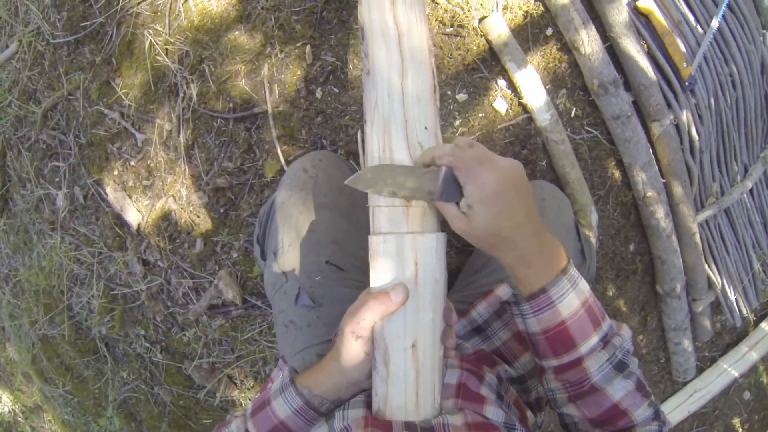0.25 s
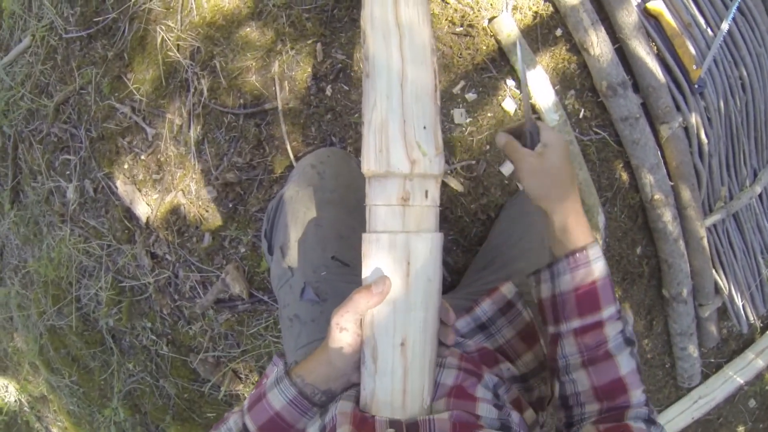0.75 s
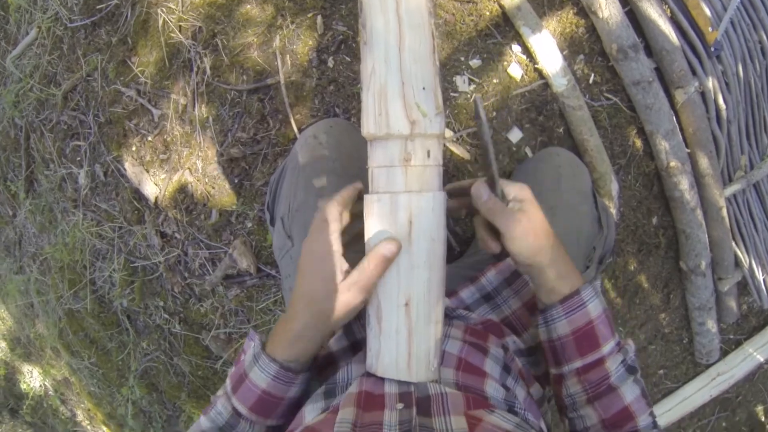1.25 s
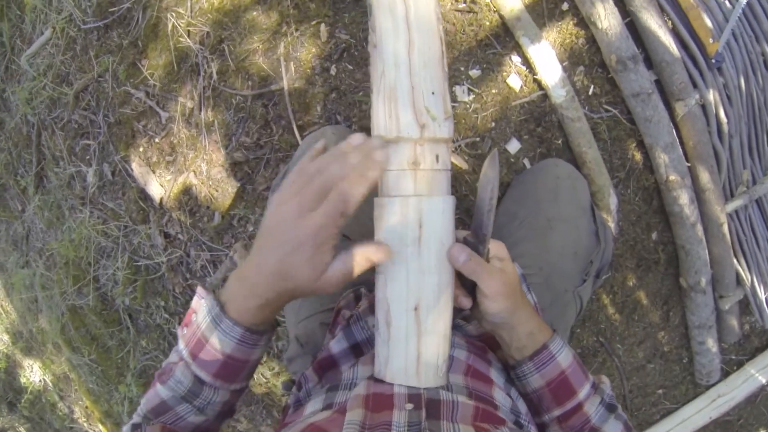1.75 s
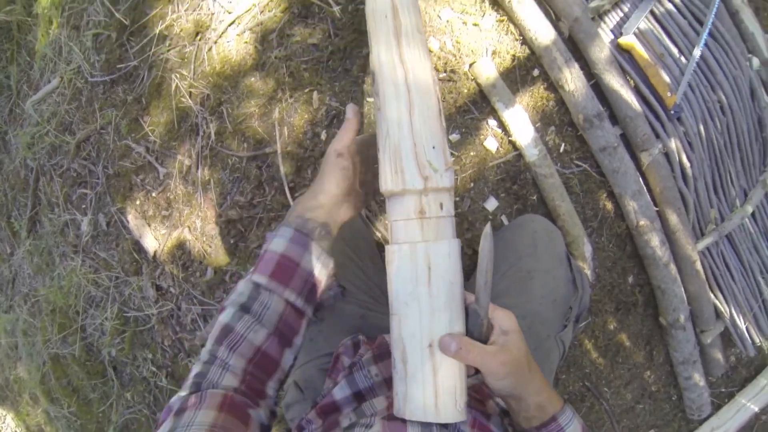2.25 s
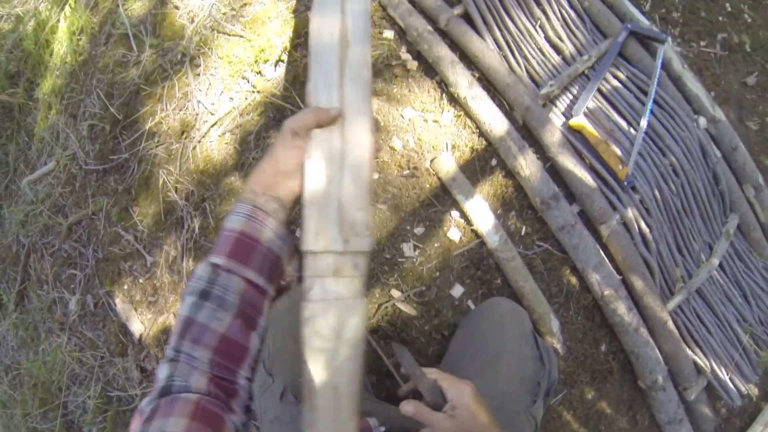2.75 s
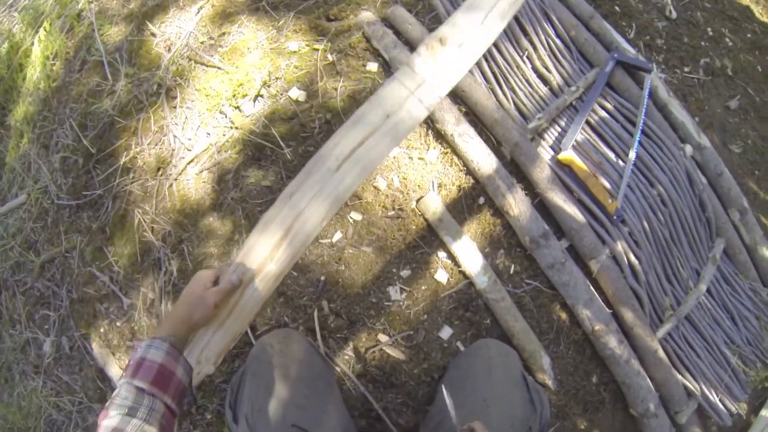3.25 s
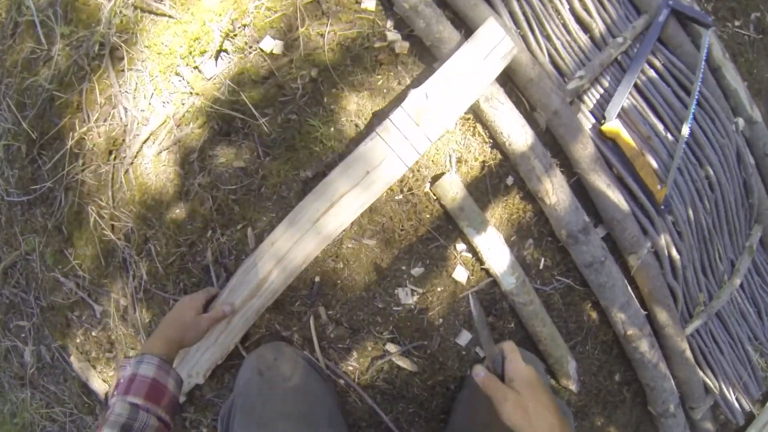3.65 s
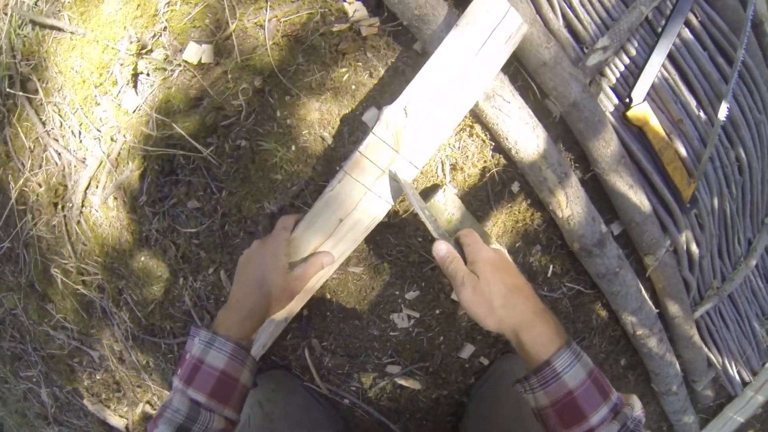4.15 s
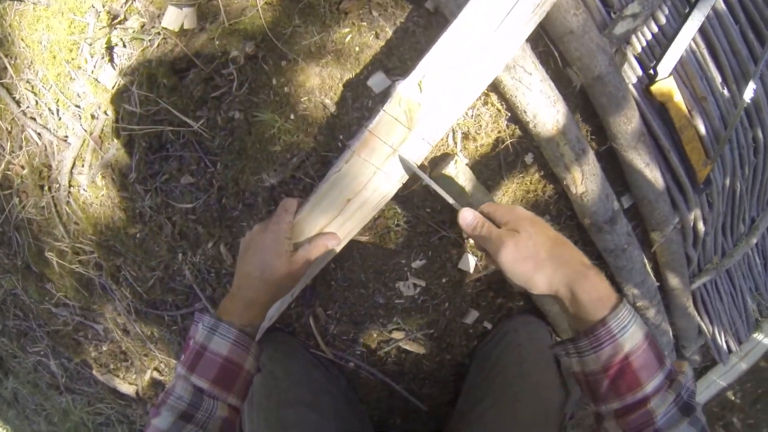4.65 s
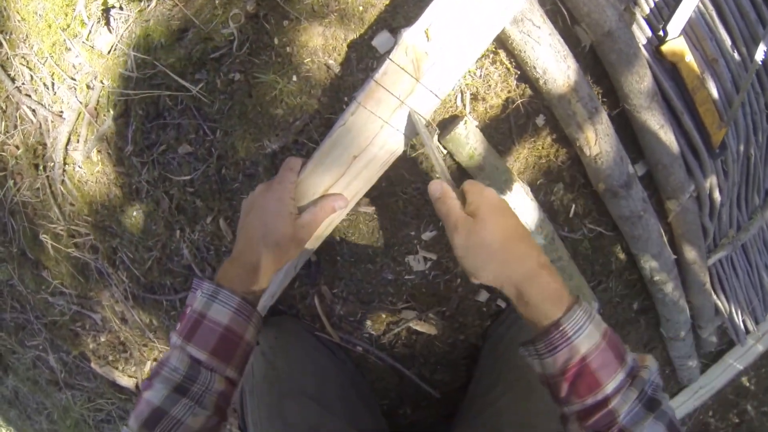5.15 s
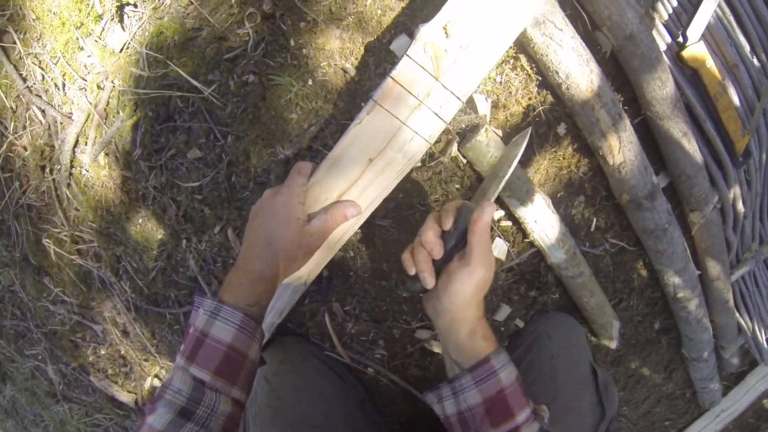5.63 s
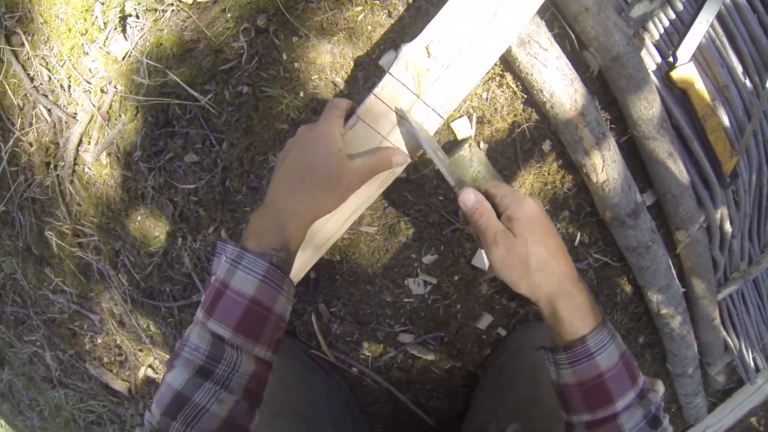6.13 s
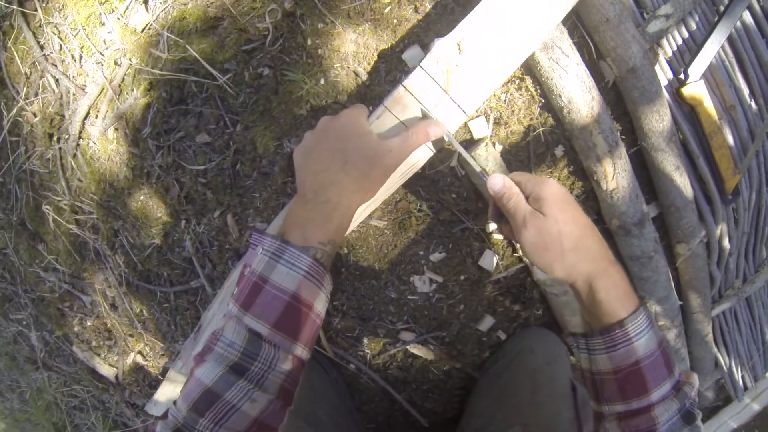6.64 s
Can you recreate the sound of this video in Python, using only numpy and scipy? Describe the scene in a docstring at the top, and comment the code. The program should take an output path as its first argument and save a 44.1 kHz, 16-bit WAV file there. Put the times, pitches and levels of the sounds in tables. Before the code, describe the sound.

A knife works dry wood outdoors with faint ticks and rubs, a hollow wooden bump, then one loud, sharp crack.

```python
"""A knife notches a dry split pole, outdoors, close to a body-worn camera.
The blade ticks on the wood, a hand brushes shavings off, the pole lands on logs with a hollow bump.
Then a block is prised out with a loud double crack: fibres tear, the freed blade hits the notch.
A low rumble and faint hiss lie underneath."""
import sys
import numpy as np
from scipy import signal
from scipy.fft import rfft, irfft
from scipy.io import wavfile

SR = 44100
rng = np.random.default_rng(int(sys.argv[2]) if len(sys.argv) > 2 else 0)


def wrap_up_sound(samples):
    """Save the sound to the file named by the first command line argument, as 16-bit audio."""
    columns = np.atleast_2d(samples).T
    # keep every value between -1 and 1, then stretch to whole-number steps
    tamed = np.clip(columns, -1, 1)
    steps = np.round(tamed * 32767).astype(np.int16)
    wavfile.write(sys.argv[1], SR, steps)


N = 303849
RING_N = SR // 2
SCENE_T, RING_T = np.arange(N) / SR, np.arange(RING_N) / SR

# splintering and contact noise spectrum: f/Hz, level/dB
SPLINTER_SPECTRUM = [(150, -9.5), (600, 10.5), (1100, 9), (1450, -5), (2000, 3), (3000, -4), (3900, 8),
                     (5000, -1), (7800, -6), (10000, -9), (12500, -11), (15500, -31.5)]
# rubbed wood spectrum: f/Hz, level/dB
WOOD_SPECTRUM = [(200, -18), (650, -6), (900, 13.5), (1050, -7.5), (1200, 7), (1450, -8), (1900, -4),
                 (2200, -10), (2900, -17), (3900, -17.5), (6500, -37), (12000, -56), (15500, -49)]


def tearing(creak_end_s=5.2676, creak_gap_s=0.0042, creak_db=-14.5, growth_db=7.5):
    """Fibres creak, each louder than the last, then tear in quick steps and shake the block."""
    # fibre tears: t/s, level/dB, splinter noise/dB re level
    tears = [(5.2689, 0.5, -11.5), (5.2718, -5.5, -4.5), (5.2765, -25, -5), (5.3070, -28.5, -1)]
    # modes of the block held by its fibres: f/Hz, level/dB, t60/s
    block_modes = [(614, -2, .010), (760, 2, 0.013), (986, -6, 0.0149), (1120, -5.5, .016),
                   (1736, -10.5, 0.0065), (2352, -19, 0.0063), (3330, -14.5, .010), (3790, -6.5, .008),
                   (4100, -10, .009), (4613, -20, .009), (5500, -17, 0.0068), (7470, -21.5, 0.0053)]
    creak = [(creak_end_s - k * creak_gap_s, creak_db - k * growth_db, -13) for k in range(5)]
    out = np.zeros(N)
    for t, db, splinter_db in creak + tears:
        fray_t60_s = 0.0072 * 2 ** (-db / 12.5)  # weak tears fray on longer
        add(out, t, undb(db) * (ring(block_modes) + undb(splinter_db) * splinter(fray_t60_s)))
    return out


def blade_strikes():
    """Blade and notch ring together, with a crunch at the contact."""
    # strikes, flat dull, edge bright: t/s, level/dB, tilt/(dB/octave)
    strikes = [(0.2818, -52.5, 3), (.3350, -34.5, -3), (0.3382, -41, -2), (0.977, -46, -11),
               (1.0080, -47, -9), (5.284, -37, 7), (5.2953, 0.5, -0.3), (5.2984, -17, -7.5),
               (5.3285, -42, 9.5), (5.3640, -50, 1), (5.377, -40.5, -6), (5.5015, -35, -5.5),
               (5.5070, -39, -5), (5.7170, -45.5, -6)]
    # modes of blade and notch: f/Hz, level/dB, t60/s
    notch_modes = [(582.6, -12.5, 0.033), (756, -6.5, 0.018), (883, -15, 0.052), (985, -10, 0.037),
                   (1171.6, -11, 0.041), (1650, -24.5, 0.021), (1830, -14.5, 0.03), (2000, -26.5, 0.021),
                   (2780, -14.5, 0.0086), (3250, -17, .012), (3488, -7.5, .016), (3610, -10, 0.011),
                   (4080, -8, .013), (4340, -12.5, .016), (4660, -22.5, .014), (3730, -45.5, .10),
                   (4320, -39, 0.066), (6640, -40.5, 0.034), (7660, -34, 0.0065)]
    out = np.zeros(N)
    for t, db, tilt_db_oct in strikes:
        t60_scale = 0.92 * 2 ** (-db / 80)  # a light touch damps less
        crunch_db = -15 + 1.2 * tilt_db_oct - 0.2 * db  # edge and light touch scuff more
        crunch = undb(crunch_db) * splinter(t60_s=0.011 * t60_scale)
        add(out, t, undb(db) * (ring(notch_modes, tilt_db_oct, t60_scale) + crunch))
    return out


def splinter(t60_s, rise_s=0.00008):
    """Noise burst of splintering wood."""
    attack = 1 - np.exp(-RING_T / rise_s)
    return attack * fade(t60_s) * noise(SPLINTER_SPECTRUM, RING_N)


def knife(cut_hz=470, leak_db=-22):
    """Tears and strikes: small bodies radiate little bass, though some leaks out through the pole."""
    cracks = tearing() + blade_strikes()
    return signal.sosfilt(butter(6, cut_hz, "high"), cracks) + undb(leak_db) * cracks


def ticks(t60_s=0.0087):
    """Blade tip and chips: bright contacts, too light to ring the pole."""
    # contacts: t/s, level/dB
    contacts = [(.2500, -63), (0.4595, -50.5), (.5230, -62.5), (.7005, -62), (1.7900, -60)]
    out = np.zeros(N)
    for t, db in contacts:
        high = band(hz=8500, width_hz=3500, size=RING_N)
        low = band(hz=3900, width_hz=1500, size=RING_N)
        add(out, t, undb(db) * fade(t60_s) * (high + undb(-8) * low))
    return out


def pole():
    """The pole lands, rocks and settles: its own ring, a dead knock from the logs, bark and grit."""
    # bumps on logs and knees: t/s, level/dB, softness/(0-1)
    bumps = [(.3355, -44.5, 0.47), (2.422, -45, 0.54), (3.4730, -14, 0.86), (3.48, -32, 0.25),
             (3.5595, -25.5, 0.2), (3.5700, -33, .05), (3.5892, -31.5, 0.05), (5.5030, -44.5, 0.98),
             (6.1510, -44.5, 1)]
    # bending modes: f/Hz, level/dB, t60/s
    pole_modes = [(102.7, -28, 0.38), (157.6, -33.5, 0.75), (195, -29.5, 0.22), (324, -42, 0.48),
                  (443.6, -9, 0.25), (497, -27, 0.066), (666, -18, 0.17), (828, 1, 0.14), (831, 1.5, 0.11),
                  (914, -5, 0.078), (1200, -44, 0.11), (1540, -28, 0.062), (2410, -21.5, .05)]
    # crushed grit spectrum: f/Hz, level/dB
    grit_spectrum = [(300, -6), (900, 1), (1800, 7), (3800, -7.5), (6000, -26), (15000, -42)]
    knock = signal.sosfilt(butter(2, hz=[350, 720], kind="band"), signal.unit_impulse(RING_N))
    knock /= np.abs(knock).max()
    out = np.zeros(N)
    for t, db, softness in bumps:
        contact_s = np.interp(softness, (0, 1), (0.00041, 0.0018))
        tilt_db_oct = np.interp(softness, (0, 1), (8.5, -3.5))
        knock_db = np.interp(softness, (0, 1), (-0.5, 12))
        bark = undb(-35) * fade(t60_s=0.091) * noise(WOOD_SPECTRUM, RING_N)
        grit = undb(-21 - 17 * softness) * fade(t60_s=0.09) * noise(grit_spectrum, RING_N)
        bending = ring(pole_modes, tilt_db_oct, t60_scale=0.92)
        thud = soften(bending + undb(knock_db) * knock, contact_s)
        add(out, t, undb(db) * (thud + bark + grit))
    return out


def hand(scrape_db=-17, grain_db=3, catch_db=2):
    """Skin slips over fine grain and catches on rough spots; it hisses near full speed."""
    # strokes: centre t/s, length/s, level/dB, skin hiss/dB re level
    strokes = [(0.374, 0.073, -57, -25), (0.961, 0.069, -49, -22.5), (1.006, 0.038, -45.5, -33),
               (1.579, 0.16, -48, -8.5), (1.844, 0.071, -49.5, -11.5), (2.423, 0.051, -58, -41),
               (2.483, 0.43, -56.5, -32), (2.757, 0.095, -54, -29), (5.893, 0.079, -53.5, -33)]
    # skin hiss spectrum: f/Hz, level/dB
    skin_spectrum = [(6000, -21), (8000, -19), (8750, -3.5), (9150, -26), (9800, 5.5), (10500, -32),
                     (15000, -39)]
    wood, skin = noise(WOOD_SPECTRUM, N), noise(skin_spectrum, N)
    scrape = undb(scrape_db) * noise(SPLINTER_SPECTRUM, N)
    out = np.zeros(N)
    for centre_s, length_s, db, skin_db in strokes:
        speed = np.cos(np.pi / 2 * np.clip((SCENE_T - centre_s) / length_s * 2, -1, 1))
        out += undb(db) * (speed * (wood + scrape) + speed ** 3.6 * undb(skin_db) * skin)
    roughness_db = grain_db * wander(points=6000) + catch_db * wander(points=1000)
    return out * unit(undb(roughness_db))


def camera_case(x):
    """The camera's case cancels a few narrow bands of near sounds."""
    # gaps between case resonances: f/Hz, width/Hz
    dips = [(1390, 260), (2560, 130), (3080, 240), (4950, 200)]
    for hz, width_hz in dips:
        x = signal.lfilter(*signal.iirnotch(hz, hz / width_hz, fs=SR), x)
    return x


def echo(x, level_db=-33, t60_s=0.17, damp_hz=3500, delay_s=0.008):
    """Ground and stacked logs scatter a thin, dull tail."""
    tail = signal.sosfilt(butter(1, damp_hz), rng.standard_normal(RING_N))
    tail *= fade(t60_s) * (RING_T > delay_s)
    return undb(level_db) * signal.fftconvolve(x, tail / np.linalg.norm(tail))[:N]


def background(air_db=-50.5, flicker_db=2, split_hz=350):
    """Rumble, drone and soft outdoor air swell slowly over a steady hum and electronic whine."""
    # outdoor air spectrum: f/Hz, level/dB
    air_spectrum = [(20, -6), (45, 8.5), (70, -1.5), (130, -9), (200, -13), (400, -17.5), (650, -14.5),
                    (950, -11.5), (1400, -23), (1900, -22), (2700, -36), (3700, -36.5), (6500, -49.5),
                    (15000, -57)]
    # drone bands: f/Hz, width/Hz, level/dB
    drone_bands = [(91, 14, -57), (127.7, 34, -61.5), (249, 120, -65)]
    # low hum and electronic whine: f/Hz, width/Hz, level/dB
    hum_bands = [(51.3, 8.7, -55), (10180, 550, -90), (14990, 260, -96)]
    # swell shapes of rumble, drone and hiss: t/s, level/dB
    rumble_curve = [(0.0, -51), (0.44, -49.5), (0.69, -50.5), (1.42, -49), (2.15, -52), (6.64, -54),
                    (6.89, -55)]
    drone_curve = [(0.0, -55.5), (1.8, -58.5), (1.94, -58.5), (3.95, -53.5), (4.11, -54), (5.45, -57.5),
                   (6.02, -53.5), (6.89, -50.5)]
    hiss_curve = [(0.0, -61), (0.77, -56.5), (1.25, -58), (1.74, -56), (3.07, -59), (3.57, -56),
                  (5.53, -61.5), (5.95, -57.5), (6.89, -60)]
    air = undb(air_db) * noise(air_spectrum, N)
    low = signal.sosfiltfilt(butter(2, split_hz), air)
    rumble = low * swell(rumble_curve, depth=0.9)
    drone = band_sum(drone_bands) * swell(drone_curve, depth=0.94)
    hum = band_sum(hum_bands)
    hiss = (air - low) * swell(hiss_curve, depth=0.85) * undb(flicker_db * wander(points=90))
    return rumble + drone + hum + hiss


def ring(modes, tilt_db_oct=0, t60_scale=1, scatter=0.003):
    """Damped modes of alternating sign, tilted about 1 kHz, detuned anew for each blow."""
    detune = 1 + scatter * rng.standard_normal(len(modes))
    out = np.zeros(RING_N)
    for k, (hz, db, t60_s) in enumerate(modes):
        gain = (-1) ** k * undb(db + tilt_db_oct * np.log2(hz / 1000))
        out += gain * fade(t60_s * t60_scale) * np.sin(2 * np.pi * hz * detune[k] * RING_T)
    return out


def soften(sound, contact_s):
    """A longer contact rounds off the blow."""
    force = np.sin(np.pi * np.minimum(RING_T / contact_s, 1)) ** 2
    return signal.fftconvolve(sound, force / force.sum())[:len(sound)]


def noise(spectrum, size):
    """Noise of rms 1 shaped by (f/Hz, level/dB) points."""
    hz, db = np.transpose(spectrum)
    f = np.maximum(np.fft.rfftfreq(size, 1 / SR), 1)
    gain = undb(np.interp(np.log(f), np.log(hz), db))
    return unit(irfft(rfft(rng.standard_normal(size)) * gain, size))


def band(hz, width_hz, size):
    """Noise of rms 1 in one resonance."""
    offset = (np.fft.rfftfreq(size, 1 / SR) - hz) / (width_hz / 2)
    return unit(irfft(rfft(rng.standard_normal(size)) / (1 + offset ** 2), size))


def band_sum(bands):
    """Steady noise in several resonances."""
    return sum(undb(db) * band(hz, width_hz, N) for hz, width_hz, db in bands)


def swell(curve, depth):
    """Gain from a (t/s, level/dB) curve re its median; depth scales the dB swing."""
    db = np.interp(SCENE_T, *np.transpose(curve))
    return undb(depth * (db - np.median(db)))


def wander(points):
    """Line through evenly spaced random values over the scene."""
    return np.interp(SCENE_T, np.linspace(0, N / SR, points), rng.standard_normal(points))


def fade(t60_s):
    """Exponential decay."""
    return np.exp(-np.log(1000) * RING_T / t60_s)


def butter(order, hz, kind="low"):
    """Butterworth filter sections."""
    return signal.butter(order, hz, kind, fs=SR, output="sos")


def undb(db):
    """Decibels to gain."""
    return 10 ** (np.asarray(db) / 20)


def unit(x):
    """Scale to rms 1."""
    return x / np.sqrt(np.mean(x ** 2))


def add(out, start_s, sound):
    """Mix a sound in at start_s."""
    i = int(start_s * SR)
    out[i:i + len(sound)] += sound[:N - i]


def scene():
    """Close woodwork and its echo over the background, mono."""
    work = camera_case(knife() + ticks() + pole() + hand())
    return (work + echo(work) + background())[None]


def record(dry, ceiling=1.5, top_hz=15400):
    """The camera rounds the loudest peaks and cuts the top."""
    lowpass = signal.ellip(8, 0.2, 70, top_hz, fs=SR, output="sos")
    return signal.sosfilt(lowpass, ceiling * np.tanh(dry / ceiling))


dry = scene()
out = record(dry)
wrap_up_sound(out)
```